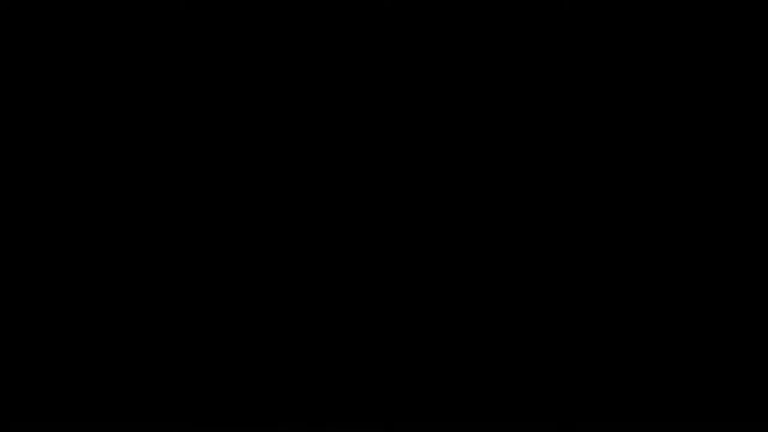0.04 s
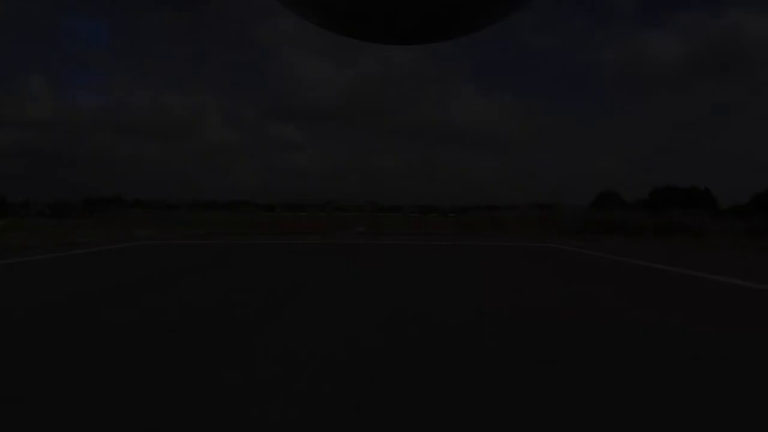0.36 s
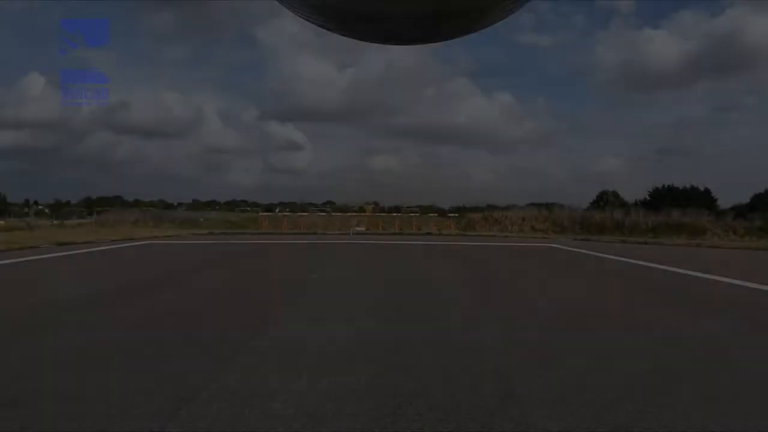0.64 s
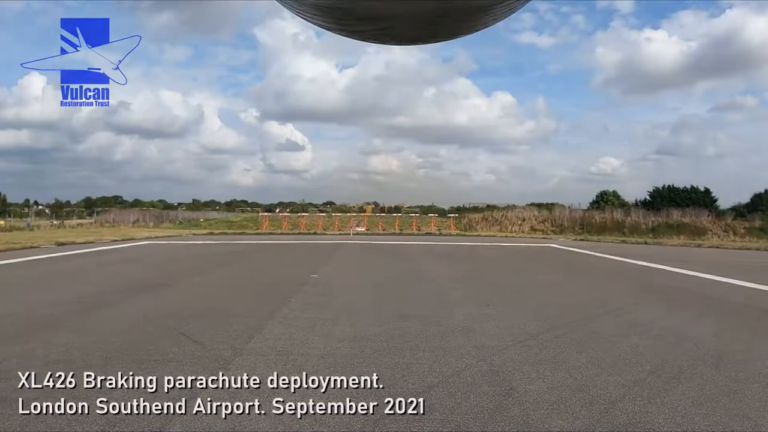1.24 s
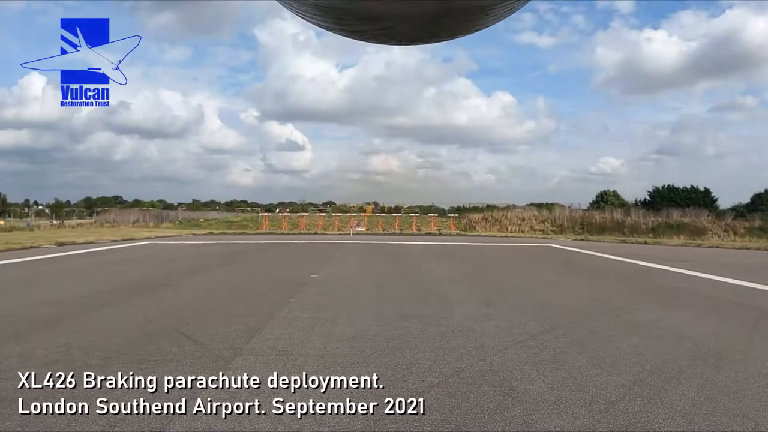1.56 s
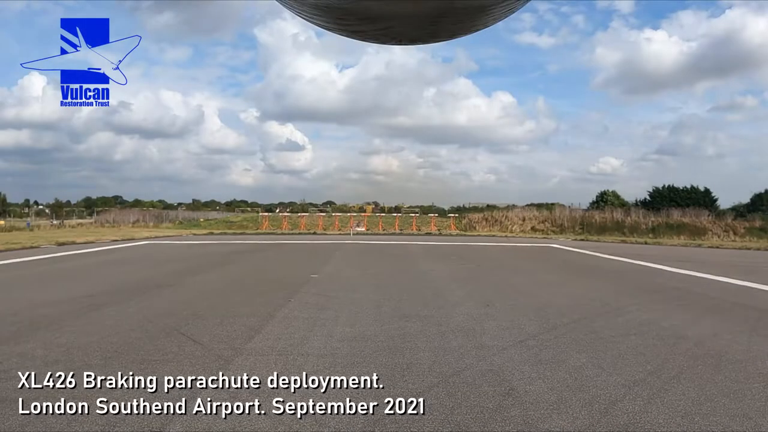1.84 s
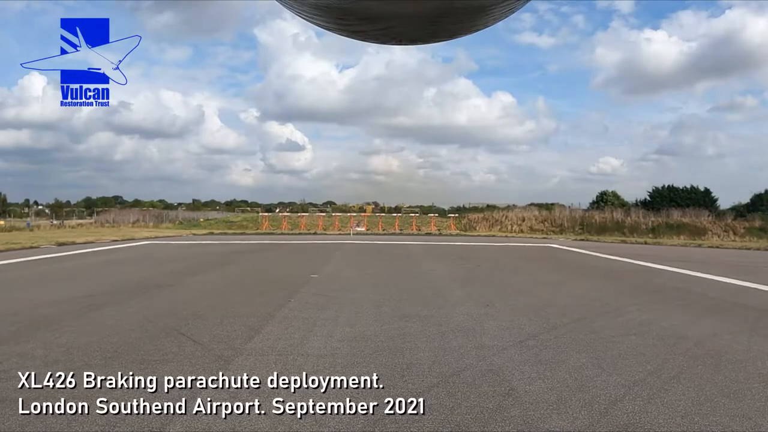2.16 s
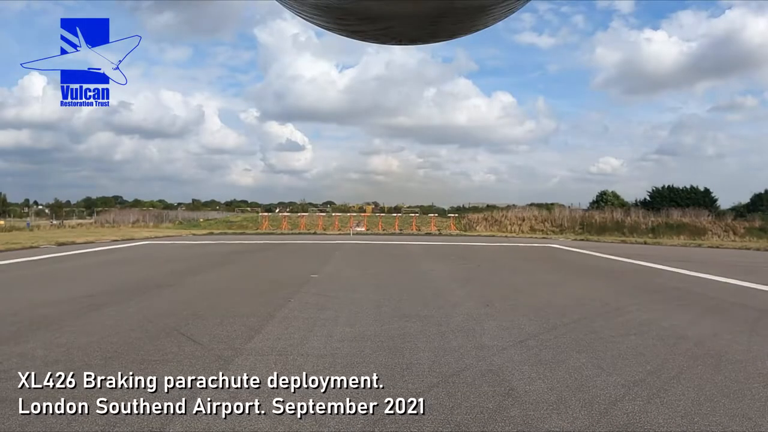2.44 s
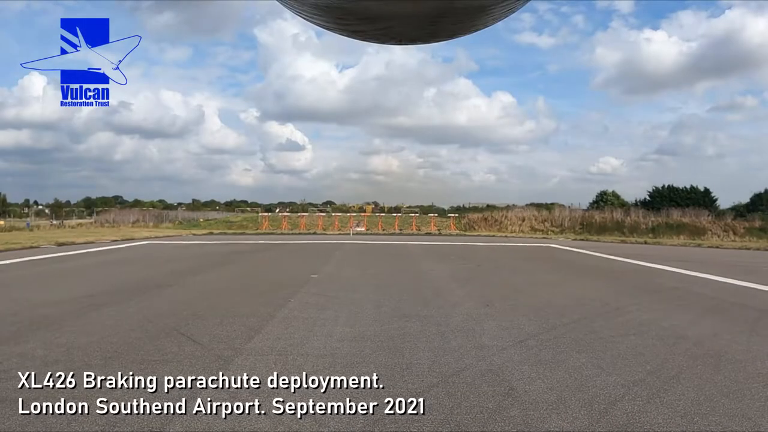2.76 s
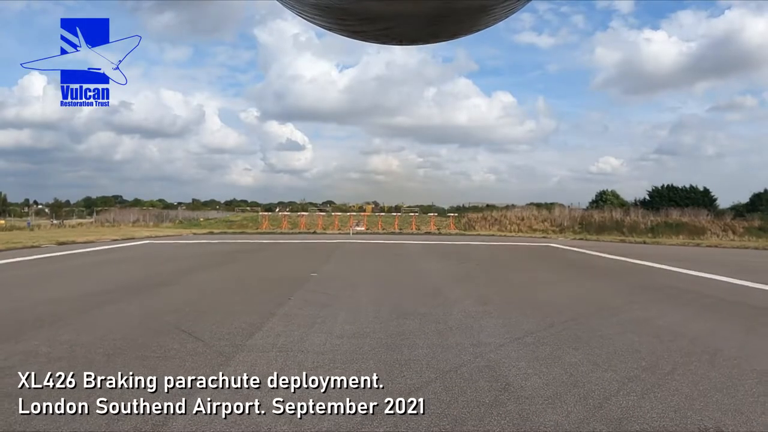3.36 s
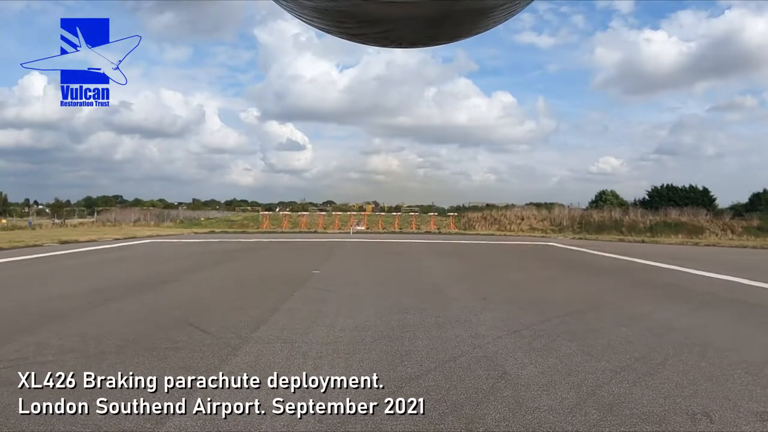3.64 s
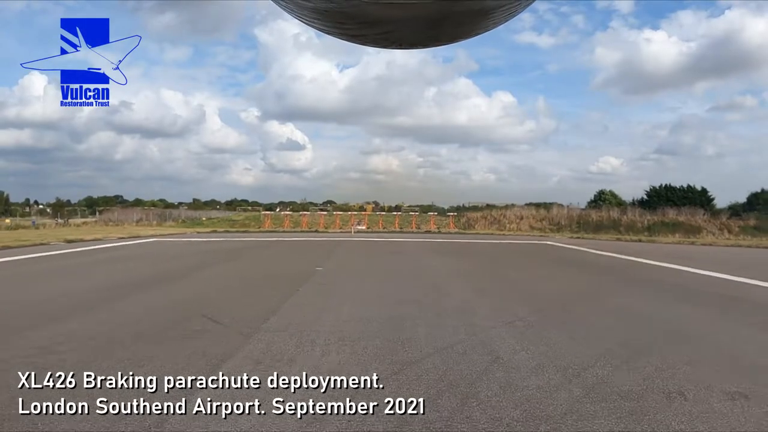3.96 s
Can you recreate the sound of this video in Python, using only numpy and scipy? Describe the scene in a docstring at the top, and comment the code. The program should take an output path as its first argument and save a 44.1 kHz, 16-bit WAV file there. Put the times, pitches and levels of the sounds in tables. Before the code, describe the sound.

Jet engines fade in and run with a loud, steady roar, a deep rumble below and a rasping hiss above. The roar grows slightly as thrust builds, heard by a stereo microphone under the aircraft on a runway.

```python
"""Jet engines spool up at the start of the runway, heard by a stereo microphone under the aircraft.
The exhaust is pure turbulence: a deep rumble alike in both channels, a wider roar, a rasping hiss.
Thrust sags at first; as it builds, the roar and hiss grow while the deep rumble eases.
The sound fades in, under a peak limiter."""
import sys
import numpy as np
from scipy.fft import rfft, irfft, next_fast_len
from scipy.io import wavfile
from scipy.ndimage import uniform_filter1d, minimum_filter1d, map_coordinates

SR = 44100
rng = np.random.default_rng(int(sys.argv[2]) if len(sys.argv) > 2 else 0)


def inscribe(sig):
    """Save sig as 16-bit PCM at rate SR to the path in sys.argv[1].

    A 1-D sig is mono; a 2-D sig holds one channel per row.
    Samples are clipped to [-1, 1] before scaling.
    """
    pcm = np.round(np.clip(np.atleast_2d(sig).T, -1, 1) * 32767)
    wavfile.write(sys.argv[1], SR, pcm.astype(np.int16))


N = 176400


def amp(db):
    """Decibels to gain."""
    return 10 ** (np.asarray(db) / 20)


def unit(x):
    """Scale to rms 1."""
    return x / np.sqrt(np.mean(x ** 2) + 1e-20)


def along(points, hz):
    """Read (frequency [Hz], value) points on a log axis."""
    knots_hz, values = np.transpose(points)
    return np.interp(np.log(hz + 1), np.log(knots_hz + 1), values)


def curve(rows):
    """Read (time [s], value) points at every sample."""
    return np.interp(np.arange(N) / SR, *np.transpose(rows))


def wobble(rate):
    """A smooth random curve, rate knots a second."""
    return map_coordinates(rng.standard_normal(N), [np.arange(N) * rate / SR + 8], order=3)


def filtered(x, response):
    """Filter x by a complex response of frequency."""
    size = next_fast_len(N + SR // 4)
    hz = np.fft.rfftfreq(size, 1 / SR)
    return irfft(rfft(x, size) * response(hz), size)[..., :N]


def steadied(x, share, span_s):
    """Even out a share of the swings in level that are slower than span_s."""
    power = np.abs(uniform_filter1d(np.mean(x ** 2, axis=0), int(span_s * SR)))
    return unit(x / (power + 1e-6) ** (share / 2))


def turbulence(colour, burst_db=0):
    """Coloured noise of rms 1 at the microphone's two ports; burst_db bunches it in time."""
    # Likeness of the two ports (frequency [Hz], correlation [0..1])
    likeness = [(30, .97), (80, 0.99), (150, 0.99), (260, 0.95), (450, 0.88), (700, .65), (1200, .65),
                (2000, 0.43), (3200, 0.6), (4200, 0.46), (5300, 0.78), (7500, .42), (12000, .3)]
    # Balance between the ports (frequency [Hz], left minus right [dB])
    balance = [(200, -0.1), (780, .8), (950, 3), (1500, 4), (3000, 3), (4900, -.5), (7500, 2.5),
               (10000, 3.5), (11700, 5), (14000, 2)]
    # Phase between the ports (frequency [Hz], left lead [rad])
    left_lead = [(100, -0.08), (500, 0.11), (950, -0.13), (1500, 0.067), (2200, -0.31), (3100, -1.3),
                 (3900, -0.045), (6500, -0.15), (12000, -0.067)]

    def ports(hz):
        """Mix two noises into left and right, one in phase and one in opposite phase."""
        turn = np.arccos(along(likeness, hz)) / 2
        common, apart = np.cos(turn), np.sin(turn)
        lean = amp(along(balance, hz) / 2) * np.exp(1j * along(left_lead, hz) / 2)
        left = [common * lean, apart * lean]
        right = [common / lean, -apart / lean]
        return amp(along(colour, hz)) * np.array([left, right])

    eddies = rng.standard_normal((2, N)) * amp(burst_db)
    return unit(filtered(eddies, ports).sum(axis=1))


def hiss(effort_db, base_db=-25, growth=0.96, rasp_db=1.24, flutter_db=0.28):
    """Fine eddies at the nozzles reach the microphone in tiny bursts."""
    # Spectrum of the fine eddies (frequency [Hz], relative density [dB])
    colour = [(900, -39), (2000, -4.5), (3000, 1), (4000, 0.9), (5200, -1), (6100, -4.5), (7600, -7),
              (8100, -12), (9500, -17.3), (11200, -24.5), (12000, -21), (12800, -28.5), (15000, -34),
              (15600, -42)]
    bursts_db = rasp_db * wobble(rate=900)
    level_db = base_db + growth * effort_db + flutter_db * wobble(rate=22)
    return amp(level_db) * turbulence(colour, bursts_db)


def roar(effort_db, base_db=-17, growth=0.61, flutter_db=0.13):
    """The jets mix with the air in a wide roar that follows the effort and flutters slightly."""
    # Spectrum of the mixing jets (frequency [Hz], relative density [dB])
    colour = [(120, -35), (280, -3.5), (420, -0.5), (580, -0.2), (700, -1), (770, -.5), (850, -2),
              (925, 2.5), (1050, 0.4), (1250, -0.4), (1600, -3.5), (2000, -7), (2700, -13.5), (4500, -26.5),
              (9000, -72)]
    level_db = base_db + growth * effort_db + flutter_db * wobble(rate=27)
    return amp(level_db) * turbulence(colour)


def rumble():
    """The largest eddies drone far down the plume; their weight shifts upward as the engines spool up."""
    # Deep rumble ahead of the fader (time [s], level [dB])
    deep_level = [(.25, -10), (.8, -13), (1.2, -13), (1.85, -15.5), (2.1, -14.5), (2.6, -15), (3.1, -14.6),
                  (3.5, -17), (4.0, -16.8)]
    # Its spectrum, strongest at 90-150 Hz (frequency [Hz], relative density [dB])
    deep_colour = [(12, -40), (25, -24), (45, -10.5), (70, -9.5), (90, -0.5), (105, 1.5), (118, -2.8),
                   (133, 2.5), (148, 1), (165, -3.5), (210, -10), (295, -14.5), (350, -10.5), (395, -15.5),
                   (430, -12), (480, -19.5), (590, -18), (800, -33), (2000, -80)]
    # Upper rumble ahead of the fader (time [s], level [dB])
    upper_level = [(.25, -17.5), (.8, -18.5), (1.4, -21.7), (2.0, -22), (2.9, -20.5), (3.4, -18),
                   (3.7, -20.5), (4.0, -19.5)]
    # Its spectrum, strongest near 215 Hz (frequency [Hz], relative density [dB])
    upper_colour = [(80, -50), (150, -17.5), (185, -1), (215, 0), (260, -2.5), (310, -8), (450, -24),
                    (1200, -74)]
    deep = steadied(turbulence(deep_colour), share=0.32, span_s=0.022)
    upper = turbulence(upper_colour)
    return amp(curve(deep_level)) * deep + amp(curve(upper_level)) * upper


def scene(surge_db=0.49):
    """The exhaust from under the aircraft: one unsteady effort drives roar and hiss above the rumble."""
    # Engine effort (time [s], relative level [dB])
    thrust = [(.25, 4.3), (.9, 0.9), (1.3, -0.7), (1.5, -1.7), (2.0, -1.5), (2.5, -0.6), (2.9, -1.2),
              (3.15, 0.3), (3.45, -0.3), (3.75, 0.3), (4.0, 1)]
    effort_db = curve(thrust) + surge_db * wobble(rate=8.9)
    return rumble() + roar(effort_db) + hiss(effort_db)


def record(dry):
    """The microphone feeds a peak limiter, a fader that opens linearly, and a treble cut-off."""
    limit_db, hold_s = -1.5, 0.0064
    fade_start_s, fade_full_s = 0.239, 1.81
    top_hz = 15650
    hold = int(hold_s * SR)
    peak = np.abs(dry).max(axis=0)
    needed_gain = np.minimum(1, amp(limit_db) / (peak + 1e-9))
    limiter_gain = uniform_filter1d(minimum_filter1d(needed_gain, hold), hold)
    fader = curve([(fade_start_s, 0), (fade_full_s, 1)])
    return filtered(dry * limiter_gain * fader, lambda hz: hz < top_hz)


dry = scene()
out = record(dry)
inscribe(out)
```